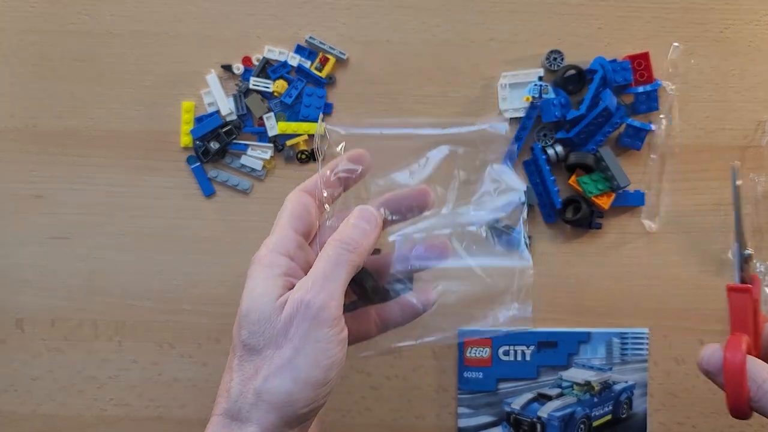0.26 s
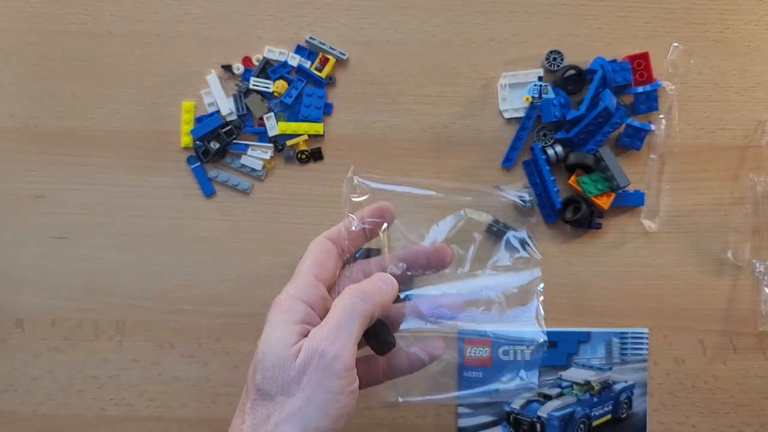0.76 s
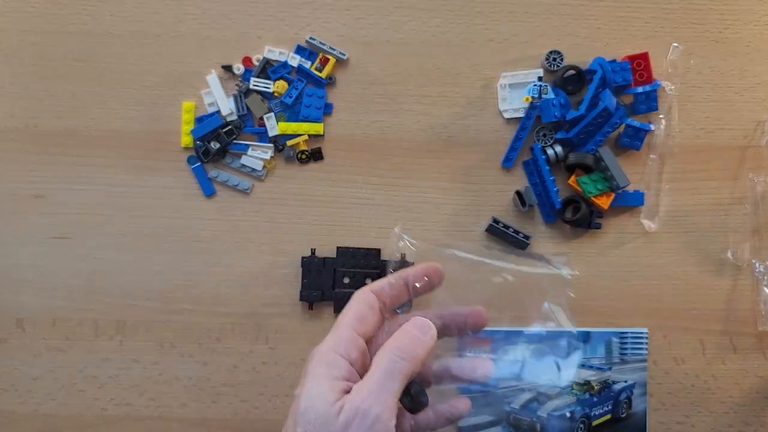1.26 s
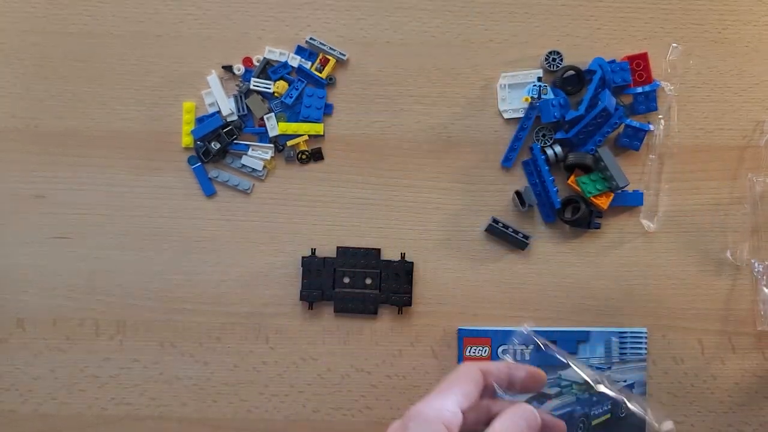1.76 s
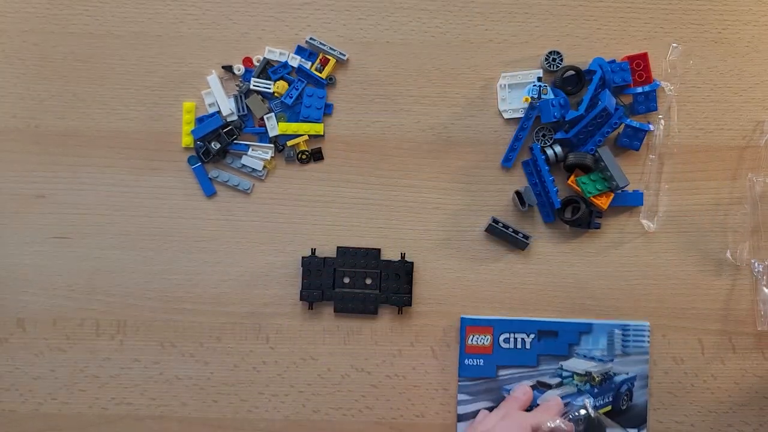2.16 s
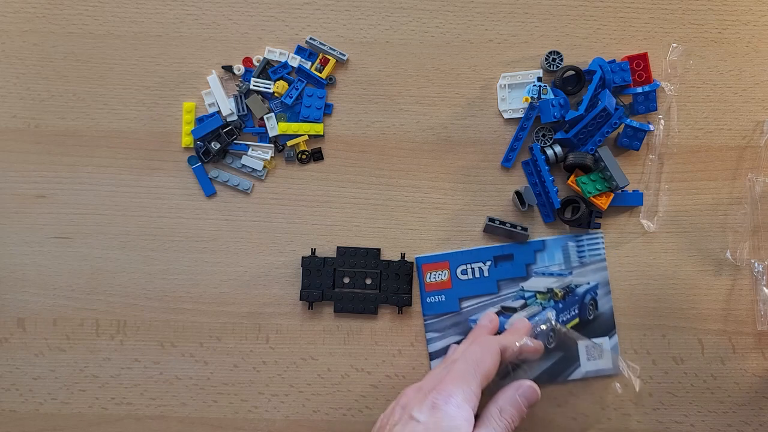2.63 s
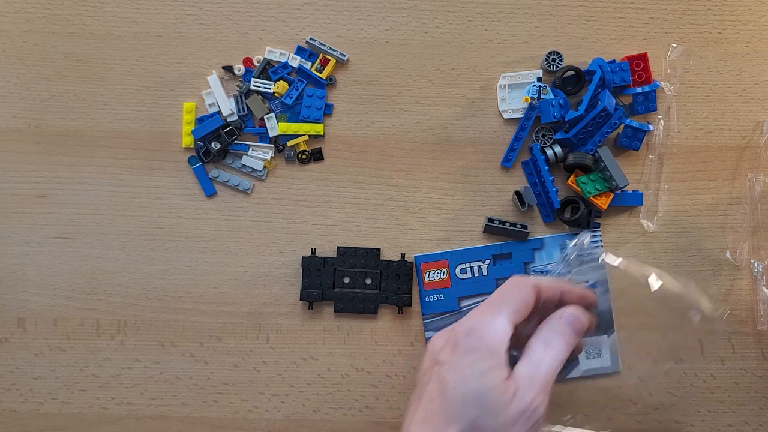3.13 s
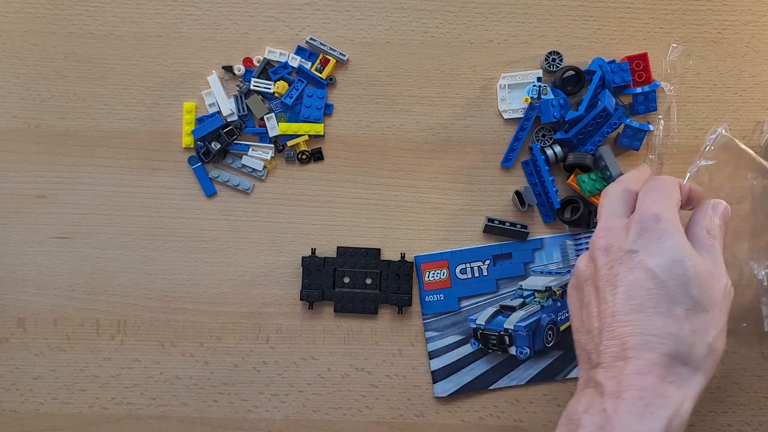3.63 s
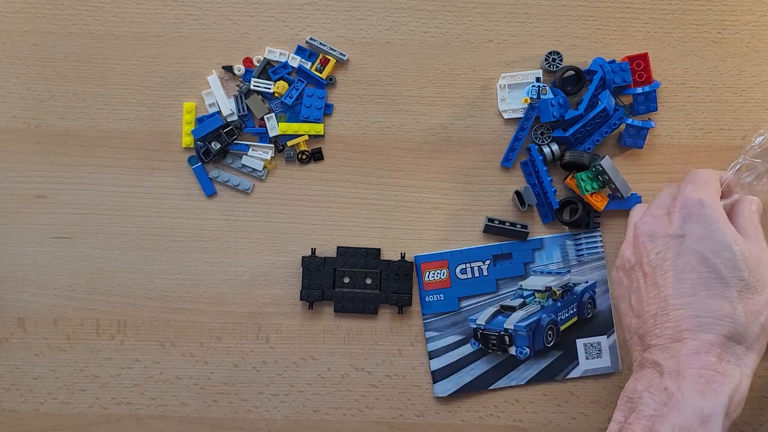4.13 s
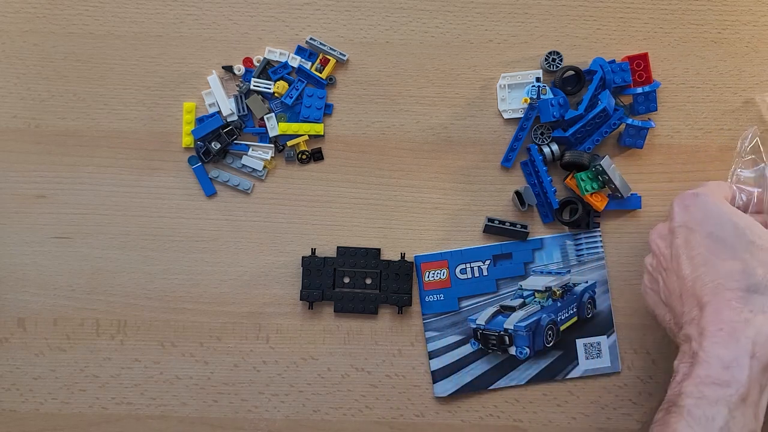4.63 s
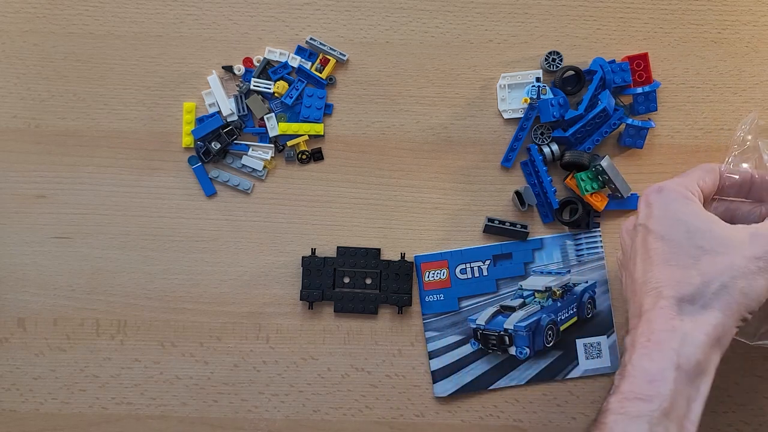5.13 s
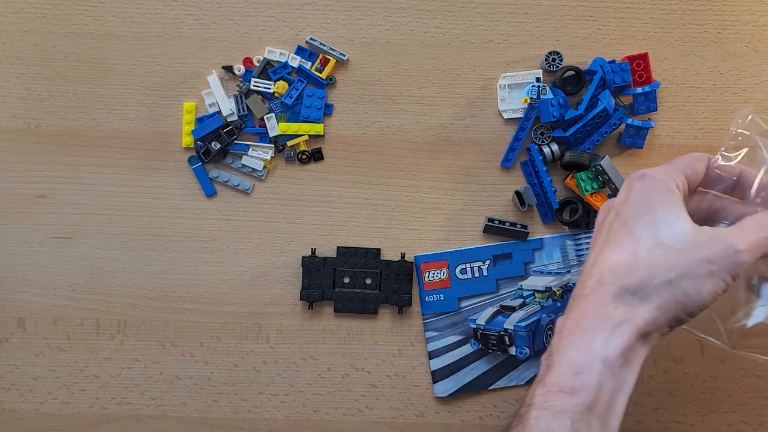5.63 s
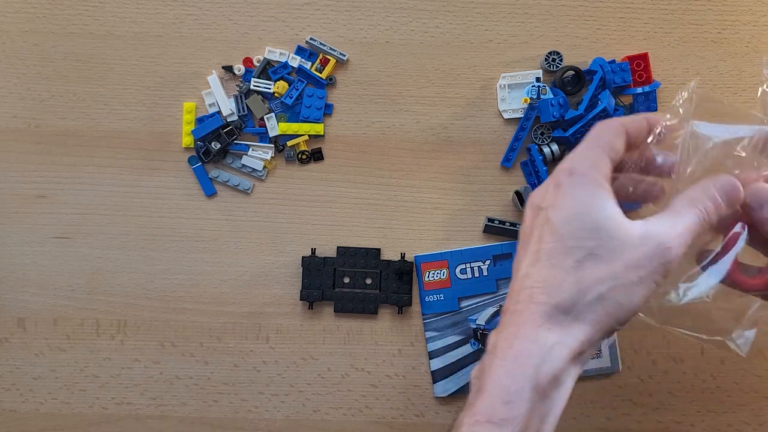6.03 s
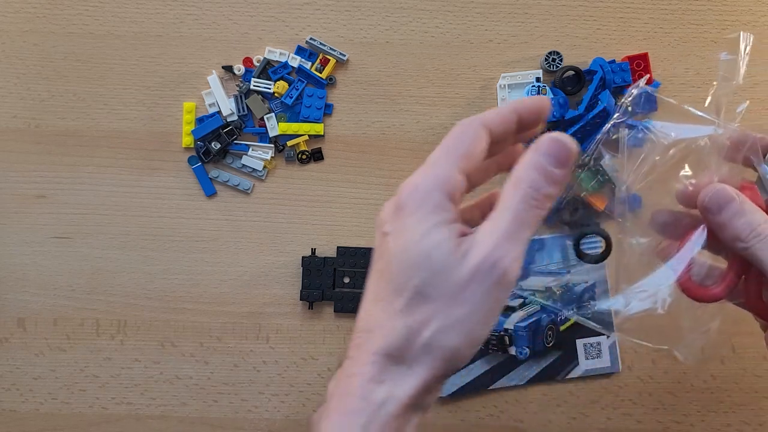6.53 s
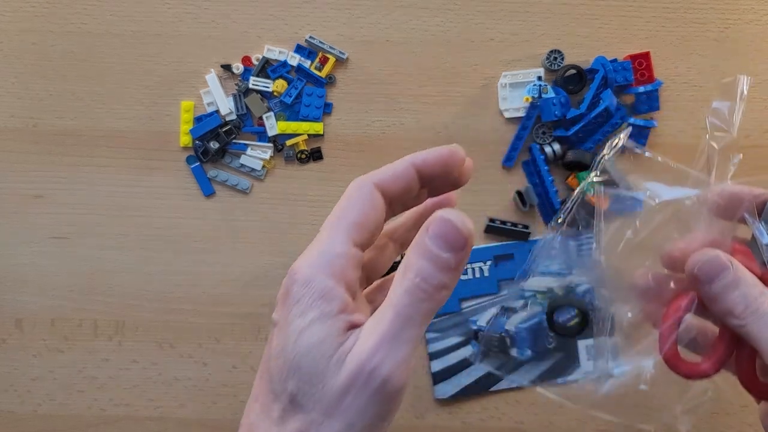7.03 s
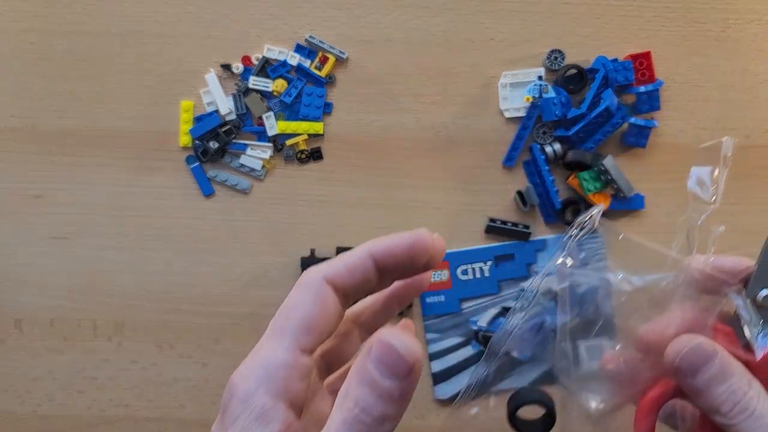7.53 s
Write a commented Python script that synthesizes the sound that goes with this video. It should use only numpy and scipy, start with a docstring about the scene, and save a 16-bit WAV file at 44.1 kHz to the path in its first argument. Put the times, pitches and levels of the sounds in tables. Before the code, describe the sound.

Close, slightly wide stereo sound of thin crisp plastic packaging handled above a wooden table indoors. Sparse dry pops come first, with a faint papery rub, then a thick burst of bright crinkling in the middle, falling back to occasional ticks. Underneath lie quiet room noise, soft table rumble and a low swelling hum, perhaps an engine idling outside. Small dull thuds come late.

```python
"""Over quiet room noise and a low hum, perhaps an idling engine outside, stiff plastic film snaps singly.
A hand crumples and moves the bags over a wooden table, and the snaps and fine creases thicken to a crackle.
Each crease is a burst of noise exciting a short ring and a broad crack; a decaying room tail follows.
A paper booklet slides as shaped noise; the table rumbles and thuds softly as filtered noise.
Two spaced microphones differ in delay, level, colour and phase."""
import sys
import numpy as np
from scipy import signal
from scipy.fft import rfft, irfft
from scipy.io import wavfile
from scipy.ndimage import uniform_filter1d

SR = 44100
rng = np.random.default_rng(int(sys.argv[2]) if len(sys.argv) > 2 else 0)


def materialize(psi):
    """Save the field psi as 16-bit PCM at rate SR to the path in sys.argv[1].

    A 1-D psi becomes a single channel; in a 2-D psi each row is a channel.
    """
    bounded = np.clip(np.atleast_2d(psi).T, -1, 1)
    quanta = np.round(bounded * 32767).astype(np.int16)
    wavfile.write(sys.argv[1], SR, quanta)


N = 343088

# Relative spectrum of the room noise: [f/Hz, level/dB per Hz]
AIR_SPECTRUM = [(12, -32.5), (20, -22.5), (63, 3), (110, -11), (158, -18.5), (459, -11.5), (527, -17.5),
                (1000, -24), (1480, -27), (4670, -38), (11400, -49.5), (16000, -77)]
# Left-right correlation of the room noise: [f/Hz, correlation]
AIR_CORRELATION = [(60, 1), (130, 0.97), (290, 0.31), (640, 0)]
# Swells of the hum: [peak t/s, level/dB, decay constant on either side t/s]
HUM_SWELLS = [(1.21, -60, 0.22), (2.0, -57.5, 0.14), (2.8, -44, 0.21), (3.5, -51, 0.27), (4.5, -41.5, 0.34),
              (5.7, -70.5, 0.78)]
# Faint steady tones: [f/Hz, level/dB, end t/s]
STEADY_TONES = [(101, -68.5, 7.78), (460, -76.5, 3.4)]
# Relative spectrum of the table rumble: [f/Hz, level/dB per Hz]
RUMBLE_SPECTRUM = [(60, -15.5), (150, -3), (300, 3.5), (600, -38.5)]
# Single creases of the film popping: [t/s, peak level/dB, ring f/Hz, treble against ring level/dB]
SNAPS = [(0.047, -24.5, 2300, -26), (0.263, -49, 1530, -27), (0.316, -23, 930, -20.5),
         (0.437, -34, 1010, -34), (0.453, -21, 805, -11.5), (0.545, -36.5, 710, -28),
         (0.877, -28, 4200, -3), (0.934, -11.5, 1260, -6), (1.25, -33, 3300, -21),
         (1.301, -33.5, 1630, -25), (1.473, -32, 1910, -28), (1.745, -39.5, 1630, -13),
         (1.883, -28.5, 1860, -24), (1.897, -13, 1510, -9.5), (2.075, -36, 5230, -16),
         (2.123, -21.5, 4450, 6.5), (2.21, -33, 1290, -21), (2.263, -24.5, 1310, -12.5),
         (2.319, -25.5, 1290, -13.5), (2.844, -34.5, 2966, -26), (2.875, -39.5, 2410, -28),
         (2.999, -46, 1480, -47), (3.017, -31.5, 1606, -78), (3.072, -22.5, 1726, -27),
         (3.096, -23, 1850, -9), (3.135, -11.5, 1460, -3), (3.401, -26.5, 4180, -30.5),
         (3.473, -23.5, 4310, -18), (3.555, -24.5, 5000, -42), (3.64, -21.5, 2310, -5.5),
         (3.649, -14, 4150, -26.5), (3.666, -16, 1670, 9.5), (3.699, -16, 2090, 2),
         (3.724, -16.5, 5000, -14), (3.81, -15.5, 1306, -15), (3.827, -11, 6860, -11),
         (3.876, -11.5, 3850, -13.5), (3.956, -13.5, 1870, -0.5), (3.971, -13, 4480, -2.5),
         (4.059, -17, 3160, -6), (4.068, -7.5, 5850, -7.5), (4.124, -4.5, 3880, -6),
         (4.193, -13.5, 1300, -15.5), (4.357, -14.5, 2605, -2.5), (4.378, -3.5, 1720, -4.5),
         (4.414, -8, 5200, 7), (4.452, -20, 4000, 13.5), (4.523, -6.5, 3010, -3.5),
         (4.594, -3.5, 1820, -7.5), (4.606, -4, 2076, -8), (4.725, -11.5, 1840, -9),
         (4.834, -2.5, 1763, -9.5), (4.89, -10, 2070, -3), (4.966, -16, 5970, 0), (5.032, -9.5, 1280, -5.5),
         (5.099, -17, 1387, -10), (5.148, -8, 3890, 1), (5.265, -12.5, 3610, -23.5),
         (5.311, -12.5, 6100, -2.5), (5.361, -6.5, 3960, -6), (5.383, -4, 3110, -8), (5.412, -3.5, 3760, 3),
         (5.473, -10.5, 1340, -1), (5.485, -11, 5300, 5), (5.504, -7.5, 2070, -4), (5.615, -23, 3110, 0),
         (5.655, -13.5, 1550, 3.5), (5.685, -12, 4500, 4.5), (5.724, -10.5, 1300, -10),
         (5.792, -6.5, 870, -6.5), (5.893, -7.5, 2180, -5.5), (5.91, -9.5, 3990, -3), (5.957, -8, 811, -6),
         (6.131, -16.5, 848, -14.5), (6.167, -25, 1370, -44), (6.196, -24.5, 827, -3),
         (6.263, -24, 1237, -30), (6.271, -18.5, 2350, -25), (6.332, -24.5, 4240, -9),
         (6.355, -16.5, 4000, -24), (6.408, -22.5, 1500, -10), (6.438, -23, 1125, -14.5),
         (6.602, -13, 1380, -7.5), (6.682, -31.5, 4610, -16), (6.802, -43, 2670, -25),
         (7.143, -52.5, 4500, -8), (7.267, -27.5, 4290, -5.5), (7.346, -35.5, 1410, -36),
         (7.378, -18.5, 4920, -15), (7.704, -15, 4490, -13)]
# Broad colour of a snap: [f/Hz, level/dB per Hz]
FILM_SPECTRUM = [(120, -51.5), (200, -21), (509, -10.5), (777, -4.5), (950, -10.5), (1420, -5.5),
                 (3430, -8), (6050, -8.5), (8580, -18), (12600, -18.5), (16000, -22.5)]
# Place of the hand: [t/s, delay of left microphone/ms, left minus right level/dB]
HAND_PATH = [(0, 0.029, -0.5), (3.2, 0.085, -10), (3.6, 0.28, -4.5), (5.3, 0.24, -6), (7.4, 0.15, -5),
             (7.7, 0.039, 0.5)]
# Activity of the small creases under the moving hand: [t/s, level/dB]
CRUMPLE_LEVEL = [(0.6, -78.5), (1.5, -63.5), (2.9, -80), (3.6, -55), (3.7, -32), (4.03, -33.5), (4.5, -22),
                 (5.1, -29.5), (5.2, -38), (5.4, -19.5), (5.6, -28), (6, -36), (6.1, -45.5), (6.5, -49),
                 (6.9, -94)]
# Room decay: [f/Hz, 60 dB decay t/s, left-right correlation]
ROOM_DECAY = [(304, 0.47, 0.037), (1000, 0.39, 0.22), (3030, 0.46, -0.19), (13000, 0.32, 0)]
# Pushes of the booklet: [t/s of top speed, level/dB, rise t/s, fall t/s]
PUSHES = [(2.3, -56, 0.33, 0.9), (2.658, -50.5, 0.053, 0.26)]
# Relative spectrum of paper on wood: [f/Hz, level/dB per Hz]
PAPER_SPECTRUM = [(350, -42), (600, -4), (919, -6), (1110, -8), (1550, 1), (6120, -8), (16000, -30)]
# Soft thuds through the table: [t/s, level/dB, centre f/Hz, 60 dB decay t/s]
THUDS = [(3.39, -51, 407, 0.96), (3.601, -50, 150, .5), (6.94, -39.5, 277, 0.51), (7.601, -53.5, 404, 0.77),
         (7.704, -36, 620, 0.08)]
# Left microphone against right: [f/Hz, level/dB, phase/rad]
LEFT_RESPONSE = [(121, -0.5, -0.33), (261, -2, 0.95), (550, -1.5, -1.3), (925, -1.5, 0.4),
                 (2000, -1.5, 0.24), (3180, 1.5, 0.52), (4470, -0.5, 0.55), (12100, 1, 0.96)]

AIR_DB = -61
HUM_DB, HUM_END_S, WAVER_DB, WAVER_S = -60, 6.88, 3, 0.045  # steady level, end, random waver
HUM_START_HZ, HUM_HZ, SETTLE_S = 40.6, 49.9, 1.8  # the pitch creeps up and settles
RUMBLE_DB = -58.5
NEAR_DB, NEAR_SPREAD_DB, BEFORE_S, AFTER_S = -12, 11.5, .007, .02  # weaker creases around each snap
CLUMP_DB, CLUMP_S = 2.5, .03  # small creases come in short flurries
SLIDE_DROP_DB = -33  # level at both ends of a push
EDGE_HZ = 16000  # upper band limit


def gain_of(db):
    """Logarithmic level: converts decibels to an amplitude factor."""
    return 10 ** (np.asarray(db) / 20)


def evened(x):
    """Power normalisation: scales to rms 1."""
    return x / np.sqrt(np.mean(x ** 2) + 1e-20)


def read(points, hz, column=1):
    """Spectral interpolation: reads a column on a log-frequency axis."""
    points = np.transpose(points)
    return np.interp(np.log(hz + 1), np.log(points[0] + 1), points[column])


def curve(rows, column=1, t=None):
    """Linear interpolation in time: reads a column at every sample, or at times t."""
    rows = np.transpose(rows)
    t = np.arange(N) / SR if t is None else t
    return np.interp(t, rows[0], rows[column], left=rows[column][0])


def noise(colour, same, patchy_db):
    """Short-time synthesis: random spectra with drifting patches give two correlated channels, rms 1."""
    frames, hz = N // 512 + 5, np.fft.rfftfreq(2048, 1 / SR)
    a, b, c, d, patches = rng.standard_normal((frames, 1025, 5)).T
    patches = uniform_filter1d(patches, 15, 0)  # smooth over frequency
    patches = evened(uniform_filter1d(patches, 6, 1))  # then over time
    same = np.clip(read(same, hz), -1, 1)[:, None]
    left, other = a + 1j * b, c + 1j * d
    z = np.array([left, same * left + np.sqrt(1 - same ** 2) * other])
    z *= gain_of(read(colour, hz)[:, None] + patchy_db * patches)
    return evened(signal.istft(z, nperseg=2048, noverlap=1536)[1][:, :N])


def air():
    """Diffuse field: steady room noise is alike in both channels at low f, independent at high f."""
    return gain_of(AIR_DB) * noise(AIR_SPECTRUM, AIR_CORRELATION, patchy_db=0.0)


def hum():
    """Harmonic addition: a low tone with a weak octave swells several times, beside faint steady tones."""
    t = np.arange(N) / SR
    hz = HUM_HZ + (HUM_START_HZ - HUM_HZ) * np.exp(-t / SETTLE_S)
    turns = np.cumsum(hz) / SR
    low = np.sin(2 * np.pi * turns) + gain_of(-25.0) * np.sin(4 * np.pi * turns)
    swells = sum(gain_of(db) * np.exp(-abs(t - s) / decay) for s, db, decay in HUM_SWELLS)
    level = gain_of(HUM_DB) + swells
    waver = evened(uniform_filter1d(rng.standard_normal(N), round(WAVER_S * SR)))
    fade = np.clip((HUM_END_S - t) / 0.5, 0, 1)
    low = low * gain_of(WAVER_DB * waver) * level * fade
    thin = sum(gain_of(db) * np.sin(2 * np.pi * hz * t) * np.clip((until - t) / 0.072, 0, 1)
               for hz, db, until in STEADY_TONES)
    return np.sqrt(2) * (low + thin)  # a sine of rms 1 has peak root two


def rumble():
    """Forced vibration: hand and arm shake the table top, a low lumpy noise weakly following the crumpling."""
    busy_db = curve(CRUMPLE_LEVEL) - max(db for s, db in CRUMPLE_LEVEL)
    shaking = noise(RUMBLE_SPECTRUM, [(100, .9), (400, .4)], patchy_db=2)
    return gain_of(RUMBLE_DB + .25 * busy_db) * shaking


def pops(rows, rise_ms, burst_ms, broad_db, alike):
    """Impulsive radiation: each crease gives a short ring and a broad crack, to left, right and room."""
    s, peak_db, ring_hz, treble_db = np.transpose(rows)[:, :, None]
    t, hz = np.arange(512) / SR, np.fft.rfftfreq(512, 1 / SR)
    first, second = rng.standard_normal((len(rows), 2, 512)).transpose(1, 0, 2)
    alike = np.clip(alike, 0, 1)
    # each side hears another face of the film
    burst = np.array([first, alike * first + np.sqrt(1 - alike ** 2) * second])
    ms = 1000 * t - 4
    shape = np.where(ms < 0, np.exp(ms / rise_ms), np.exp(-ms / burst_ms))  # the crease loads, then lets go
    drive = rfft(burst * shape)

    no_bass = hz / (hz + 500)
    ring = no_bass / (1 + 1j * 18.0 * (hz - ring_hz) / np.sqrt(ring_hz * 2000))
    wide = no_bass / (1 + 1j * 7.2 * (hz - ring_hz) / ring_hz)  # a broader ring at the same pitch, for the sound spread into the room
    octaves = np.log2((hz + 1) / ring_hz)
    above = np.clip(octaves / np.log2(9000 / ring_hz), 0, 1)
    tilt_db = (-0.22 + 1.09 * above) * (treble_db + 10)  # dull pops fall away above their ring
    below_db = 2.3 * np.minimum(octaves, 0)
    crack = gain_of(broad_db + read(FILM_SPECTRUM, hz) + tilt_db + below_db)
    table = gain_of(-23.0) / (1 + 1j * (hz - 760) / 90)  # the wooden top answers with a short low note
    crack = crack * (1 + table)

    # all directions together are smoother, so the room gets a partly noise-free spectrum
    pulse = np.linalg.norm(shape) * np.exp(-2j * np.pi * hz * .004)
    to_room = pulse * (0.44 * wide + crack) + 0.63 * drive[1] * (0.4 * wide + crack)
    z = np.array([*(drive * (ring + crack)), to_room])
    delay_s = curve(HAND_PATH, t=s) / 1000
    z[0] *= gain_of(curve(HAND_PATH, column=2, t=s)) * np.exp(-2j * np.pi * hz * delay_s)
    sound = irfft(z)
    sound *= gain_of(peak_db) / abs(sound[:2]).max(axis=(0, 2))[:, None]
    start = np.round((s - .003) * SR).astype(int)
    at = (start + np.arange(512)).clip(0, N - 1).ravel()
    return np.array([np.bincount(at, side.ravel(), N) for side in sound])


def snaps():
    """Sudden buckling: single creases of stiff film release as separate pops."""
    return pops(SNAPS, rise_ms=1.0, burst_ms=0.91, broad_db=-3.5, alike=0.76)


def neighbours(count=3):
    """Clustered release: a few weaker creases lie close around each snap, near in pitch."""
    s, peak_db, ring_hz, treble_db = np.repeat(SNAPS, count, axis=0).T
    when, size, pitch = rng.random((len(s), 3)).T
    near_s = s - BEFORE_S + (BEFORE_S + AFTER_S) * when
    near_db = peak_db + NEAR_DB - NEAR_SPREAD_DB * size
    near_hz = np.minimum(ring_hz * 2.2 ** (pitch - .5), 7000)
    rows = np.transpose([near_s, near_db, near_hz, treble_db])
    return pops(rows, rise_ms=0.7, burst_ms=0.3, broad_db=1.0, alike=0.89)


def crackle(count=3000):
    """Random impulse train: many small creases, as loud as the hand is busy; a few are large."""
    when, size, pitch, treble = rng.random((count, 4)).T
    s = when * N / SR
    flurries = evened(uniform_filter1d(rng.standard_normal(N), round(CLUMP_S * SR)))
    clumps = flurries[(s * SR).astype(int)]
    size_db = 3.25 * np.minimum(-np.log(size + 1e-9), 4.5)  # exponential spread of levels, capped
    peak_db = curve(CRUMPLE_LEVEL, t=s) + CLUMP_DB * clumps + size_db
    rows = np.transpose([s, peak_db, 800 * 7.0 ** pitch, -16 + 12 * treble])
    return pops(rows, rise_ms=0.6, burst_ms=0.93, broad_db=1.0, alike=0.74)


def room(x):
    """Reverberation: sparse taps of random sign decay at a rate set by f; three tails take turns."""
    t, out = np.arange(N) / SR, 0
    for k in range(3):
        taps = np.zeros((2, SR // 2))
        slots = np.arange(130, SR // 2 - 20, 10)
        at = slots + rng.integers(0, 10, (2, len(slots)))
        np.put_along_axis(taps, at, rng.choice([-1., 1.], at.shape), 1)
        hz, lag, z = signal.stft(taps, SR, nperseg=128)
        same = np.clip(read(ROOM_DECAY, hz, column=2), -1, 1)[:, None]
        z[0] = same * z[1] + np.sqrt(1 - same ** 2) * z[0]
        early = 1 + 3.0 * np.exp(-lag / 0.011)  # the table and near walls answer first and loudest
        decay = gain_of(-60 * lag / read(ROOM_DECAY, hz)[:, None])
        tail = signal.istft(z * early * decay, SR, nperseg=128)[1]
        tail = tail / np.linalg.norm(tail[0])
        turn = np.sqrt(2 / 3) * np.cos(2 * np.pi * (3 * t + k / 3))  # squares of the three sum to 1
        out = out + signal.fftconvolve((x * turn)[None], tail, axes=1)[:, :N]
    return out


def booklet():
    """Sliding friction: paper rubbing over wood, a patchy hiss that rises and falls with each push."""
    speed = 0
    for s, db, rise, fall in PUSHES:
        start, end = s - rise, s + fall
        push_db = db + curve([(start, SLIDE_DROP_DB), (s, 0), (end, SLIDE_DROP_DB)])
        gate = curve([(start - .02, 0), (start, 1), (end, 1), (end + 0.08, 0)])
        speed = speed + gain_of(push_db) * gate
    return speed * noise(PAPER_SPECTRUM, [(100, .3), (9000, .1)], patchy_db=1)


def thuds():
    """Modal excitation: a soft blow shakes the many low modes of the table top, which die together."""
    out, t = np.zeros((2, N + SR)), np.arange(SR // 2) / SR
    for s, db, hz, t60 in THUDS:
        shake = rng.standard_normal((2, len(t)))
        shake[1] = 0.5 * shake[0] + 1.23 * shake[1]
        band = signal.butter(2, [hz / 1.55, hz * 1.29], "bandpass", fs=SR, output="sos")
        dull = signal.butter(1, [hz, hz * 6.7], "bandpass", fs=SR, output="sos")
        body = evened(signal.sosfilt(band, shake)) + 0.068 * evened(signal.sosfilt(dull, shake))
        envelope = gain_of(db - 60 * t / t60) * np.minimum(t / .004, 1)
        out[:, round(s * SR):][:, :len(t)] += body * envelope
    return out[:, :N]


def scene():
    """Superposition: room noise, hum, rumble, bag with its reverberation, paper and thuds add linearly."""
    bag = snaps() + neighbours() + crackle()
    reverberant = gain_of(-6.0) * room(bag[2])
    return air() + hum() + rumble() + bag[:2] + reverberant + booklet() + thuds()


def record(dry):
    """Linear filtering: the left microphone has its own colour and phase; then both are band-limited."""
    hz = np.fft.rfftfreq(N, 1 / SR)
    response = gain_of(read(LEFT_RESPONSE, hz)) * np.exp(1j * read(LEFT_RESPONSE, hz, column=2))
    left = irfft(rfft(dry[0]) * response, N)
    edge = signal.firwin(511, EDGE_HZ, window=("kaiser", 9), fs=SR)
    return signal.oaconvolve(np.array([left, dry[1]]), edge[None], "same")


dry = scene()
out = record(dry)
materialize(out)
```